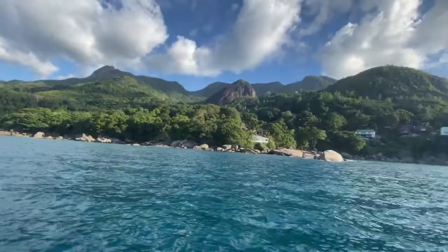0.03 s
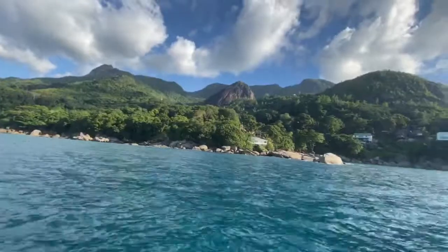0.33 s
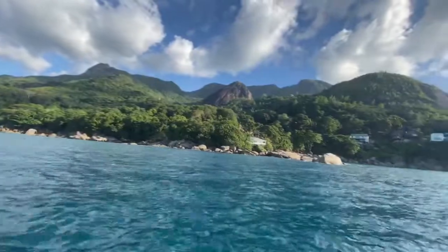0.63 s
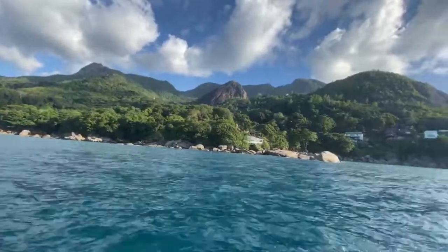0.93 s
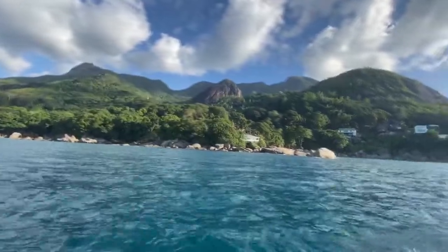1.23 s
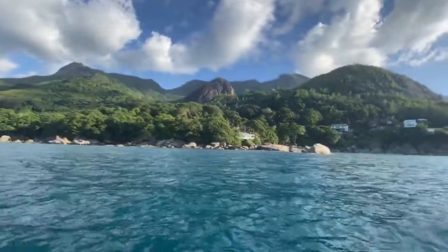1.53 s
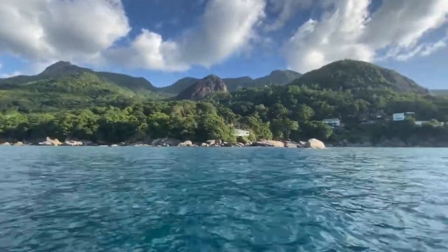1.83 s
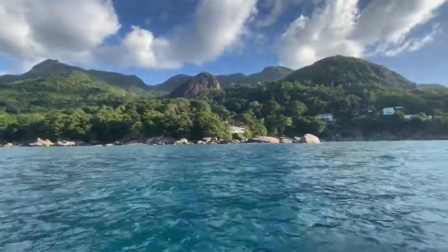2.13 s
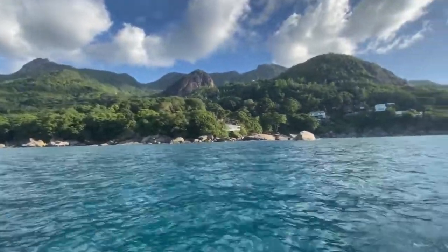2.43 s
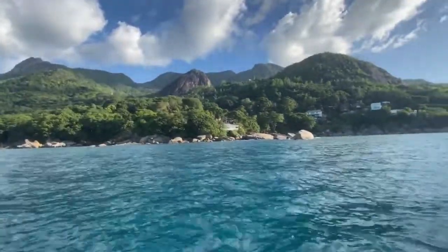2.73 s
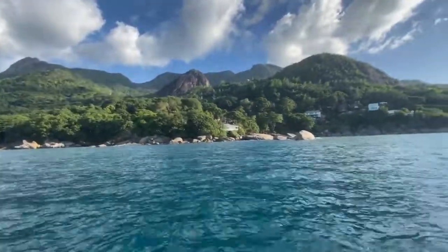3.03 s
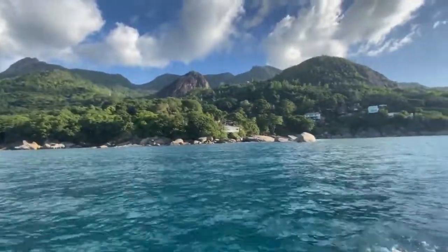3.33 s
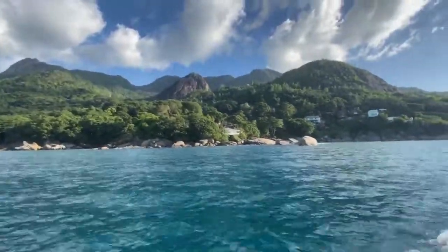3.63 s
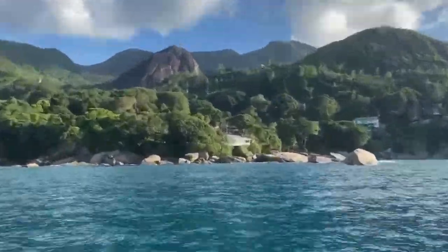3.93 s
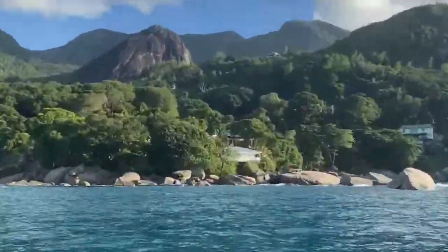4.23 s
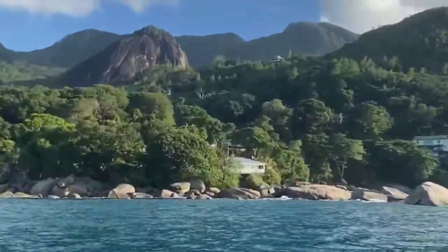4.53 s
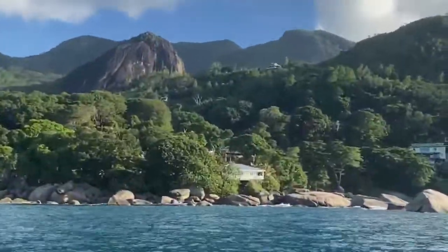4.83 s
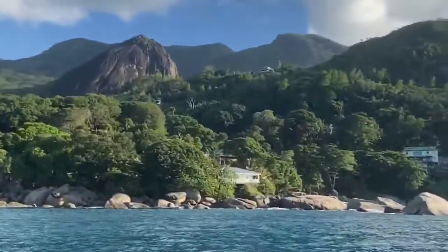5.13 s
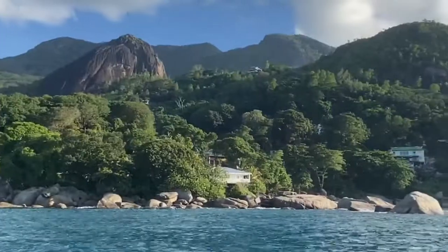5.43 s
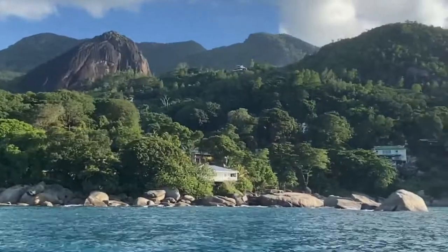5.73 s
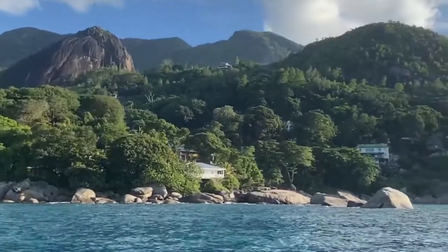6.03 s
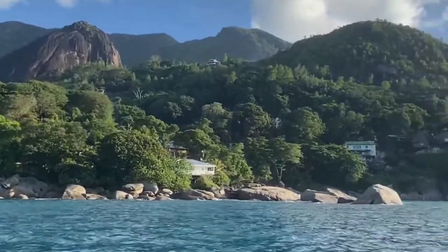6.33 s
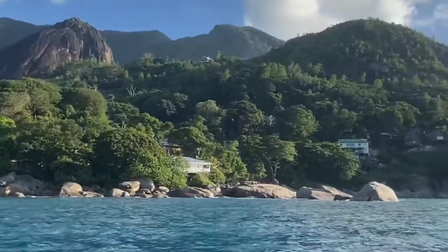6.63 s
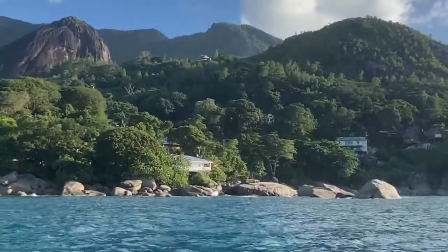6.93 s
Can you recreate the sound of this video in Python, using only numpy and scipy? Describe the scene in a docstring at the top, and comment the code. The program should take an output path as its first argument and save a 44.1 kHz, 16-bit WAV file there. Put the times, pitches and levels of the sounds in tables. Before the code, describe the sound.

Deep, ragged wind rumble and flutter on the microphone cover the foamy wash and faint engine of a boat at sea.

```python
"""On a motor boat running along a coast, a phone is held into the wind.
Eddies buffet its two microphone ports: deep rumble, ragged flutter, brief throbs and cracks.
Behind them, bow foam hisses and the engine drones on multiples of its shaft rate.
Near 4 s the camera zooms in and the stereo image narrows from very wide to almost mono."""
import sys
import numpy as np
from scipy import signal
from scipy.fft import rfft, irfft, next_fast_len
from scipy.io import wavfile
from scipy.ndimage import uniform_filter1d, minimum_filter1d

SR = 44100
rng = np.random.default_rng(int(sys.argv[2]) if len(sys.argv) > 2 else 0)


def write(x):
    x = np.atleast_2d(x).T
    wavfile.write(sys.argv[1], SR, np.round(np.clip(x, -1, 1) * 32767).astype(np.int16))


N = 316197
TIME_S = np.arange(N) / SR
FFT_SIZE = next_fast_len(N)

# camera zoom: t/s, zoom (0 wide, 1 fully in)
ZOOM_PATH = [(0, 0), (3.75, 0), (4.05, 0.5), (4.5, 0.64), (7.17, 0.83)]
# corner below which the ports move together: t/s, f/Hz
MONO_CORNER = [(0, 264), (1.2, 224), (1.6, 159), (2.2, 117), (2.8, 84.6), (3.1, 45), (7.17, 36.3)]
# spectra: f/Hz, wide gain/dB, zoomed gain/dB, wide side-to-mid/dB, zoomed side-to-mid/dB
FOAM_BANDS = [(810, -4, 24, -2, 3.5), (2200, 6.5, 11.5, 4, -29), (3500, 5.5, 6.5, -1.5, -49),
              (5640, 4.5, 1, -0.7, -46.5), (7160, -0.5, 2.5, -0.5, -38), (8360, -4.5, -15, 2, 18.5),
              (9440, -3, -0.5, -1.5, -5), (14300, -16, -11.5, 0, 2)]
RUMBLE_BANDS = [(22, -46, -32, -3, -8), (39.5, -17, -28, 1, -8), (61, 3, 4, 6.5, -16),
                (96, 2.5, 1, -4, -11), (159, -2.5, -3, -10, -8.5), (279, -11, -8, -6, -5.5),
                (494, -29, -49, 15, 26)]
FLUTTER_BANDS = [(136, 9, -12, 9, 6), (256, 5, 5.5, 6, -21), (480, 1.5, 8, 6, -14.5), (665, 2, 4.5, 6, -16),
                 (1136, 1.5, -8, 1, -9), (1383, -1, -10.5, 1, 0.5), (2130, -11, -36, -2, -7),
                 (3000, -21, -50, 2.5, 0), (4640, -31, -61, -1, -23), (7800, -48, -63, -11, -9)]
# engine drone: t/s, level/dB
ENGINE_LEVEL = [(0, -38), (.6, -26), (1.1, -29), (1.5, -25.5), (3, -42), (7.17, -33)]
# engine partials: multiple of shaft rate, relative level/dB
SHAFT_ORDERS = [(2, 4), (3, -25), (4, -24), (5, 1), (6, -1), (10, -1)]
# steady wake hiss, before trim: t/s, level/dB
WAKE_LEVEL = [(0, -42), (1.3, -47), (2.1, -49), (3.8, -54.5), (4.65, -56.5), (5.7, -51), (5.92, -46.5),
              (7.17, -45.5)]
# waves breaking on the bow, before trim: t/s, level/dB, foam decay/s
BOW_WAVES = [(.52, -39, 0.5), (.77, -35, 0.36), (1.47, -42, 0.2), (1.85, -46, 0.12), (2.42, -41, 0.57),
             (2.9, -47, 0.54), (3.501, -49.5, 1), (4.39, -47, 0.25), (4.89, -42.5, 0.29),
             (5.25, -43.5, 0.54)]
# spray landing: t/s, half-width/s, level/dB
SPRAY_SHEETS = [(0.484, 0.092, -33), (1.483, 0.059, -33.5)]
# steady wind, before trims: t/s, deep rumble/dB, upper rumble/dB, flutter/dB, treble edge/dB
WIND_LEVELS = [(0, -22.5, -21, -28, -35), (.85, -20, -14.5, -23.5, -33.5), (1.3, -16.5, -18, -24, -31.5),
               (1.75, -22, -18.5, -24.5, -31), (2.15, -19.5, -23.5, -26, -30.5),
               (2.6, -20.5, -27, -26, -32), (2.9, -21, -28.5, -28, -35.5), (3.17, -28.5, -47, -24.5, -33),
               (3.4, -24.5, -34, -23.5, -35), (3.62, -29, -25, -24.3, -34), (3.95, -39, -23, -27, -46),
               (4.6, -18.5, -21, -24.5, -34), (4.7, -37, -25, -34.5, -49), (5.0, -34, -30.5, -36, -59.5),
               (5.6, -27.5, -32.5, -34.5, -46), (5.85, -26.5, -30, -26.5, -40.5),
               (6.35, -27.5, -24, -30.5, -44), (7.17, -21.5, -22.5, -25, -45)]
# gusts: t/s, half-width/s, flutter lift/dB, deep rumble lift/dB
WIND_GUSTS = [(0.185, 0.049, 0, 8.5), (1.504, 0.053, 2, 7), (2.32, 0.092, 1, 0), (4.256, 0.089, 5, -1),
              (4.345, 0.037, 0, 8), (5.26, 0.23, 7.5, 4.5), (6.117, 0.048, 2, -9)]
# stream slipping off the phone: t/s
LULL_TIMES = [1.299, 2.869, 3.227, 3.462, 4.115, 4.635, 4.74, 5.215, 5.555, 5.80, 5.895, 6.28, 6.605, 6.70,
              6.91, 7.10]
# even eddy shedding: t/s, f/Hz, peak/dB, length/s
RUMBLE_THROBS = [(0.308, 101.5, -9.5, 0.09), (0.458, 99.6, -12, 0.1), (0.83, 102.5, -9, 0.055),
                 (1.016, 133, -12, 0.052), (1.183, 116, -11, 0.066), (1.498, 71.3, -14.5, 0.15),
                 (1.74, 61.8, -10, 0.11), (1.914, 106, -10.5, 0.028), (1.954, 160, -15.5, 0.038),
                 (2.355, 86, -20, 0.14), (3.057, 116.7, -20, 0.032), (3.274, 100, -15.5, 0.036),
                 (3.394, 116.1, -16.5, 0.054), (4.002, 125, -10.5, 0.017), (4.593, 147, -28, 0.051),
                 (5.242, 105, -17, 0.026), (6.776, 115, -11.5, 0.051), (6.858, 173, -9, 0.02),
                 (7.06, 102.5, -11.5, 0.024)]
# single vortices at a port rim: t/s, level/dB
RIM_CRACKS = [(.878, -21), (1.012, -22), (1.115, -22), (1.242, -25), (1.328, -20), (1.502, -26),
              (1.53, -19), (1.58, -14), (1.621, -25.5), (1.671, -19.5), (1.697, -18), (1.797, -21.5),
              (1.864, -21), (1.895, -19), (1.922, -19.5), (2.005, -23), (2.04, -23), (2.129, -25),
              (2.28, -22), (2.292, -13), (2.44, -21.5), (2.703, -24), (2.815, -23), (2.908, -25.5),
              (3.252, -28.5), (3.375, -27), (3.448, -25.5), (3.8, -30), (3.817, -28.5), (4.012, -30.5),
              (4.206, -32), (4.589, -37)]
# hardest eddies, before band gains: t/s, level/dB, length/s
EDDY_SLAPS = [(0.177, -24, .0051), (0.523, -23, 0.0096), (0.743, -23.5, .012), (0.794, -22, .012),
              (0.874, -17, 0.014), (0.9, -19, .011), (1.017, -21, 0.02), (1.041, -21, 0.03),
              (1.327, -22, 0.012), (1.394, -19, 0.02), (1.582, -13, 0.011), (1.712, -27, .013),
              (1.974, -23, 0.0095), (2.288, -17, 0.013), (2.601, -19, .01), (2.651, -25, 0.017),
              (2.982, -39, 0.017), (3.157, -27, .013), (3.195, -20.5, 0.03), (3.295, -14, 0.014),
              (3.402, -23, 0.01), (3.526, -20.5, 0.0045), (3.596, -23, 0.011), (3.614, -18, 0.015),
              (3.768, -26, .014), (3.81, -33, 0.0069), (4.168, -22.5, 0.039), (4.586, -21.5, 0.043),
              (5.12, -26.5, .016), (5.197, -19.5, .011), (5.861, -23, .021), (6.406, -23.5, 0.013),
              (6.445, -26, .0098), (6.5, -30, 0.01), (6.568, -24.5, .015), (6.649, -23.5, 0.052),
              (6.772, -18.5, 0.039), (6.856, -19.5, 0.013), (6.985, -21, 0.02), (7.05, -18.5, 0.022),
              (7.071, -10, 0.0063)]
# fitfulness of the stream: t/s, added flutter depth/dB
FLUTTER_DEPTH = [(0, -1.5), (2.6, -0.5), (3.6, 0), (4.3, 2), (5.5, -0.5), (7.17, 2)]
# flutter bias to the windward port: f/Hz, left lean (0-1)
WINDWARD_LEAN = [(200, 0.21), (550, 0.35), (1050, 0.29), (1700, 0.4), (4000, 1)]


def undb(db):
    """Decibels to gain."""
    return np.exp(np.asarray(db, np.float32) * np.float32(np.log(10) / 20))


def curves(table):
    """Each column of a timed table, interpolated per sample."""
    t_s, *columns = np.transpose(table)
    return [np.interp(TIME_S, t_s, column).astype(np.float32) for column in columns]


def swell(age_s, rise_s, fall_s):
    """Gaussian hump, height 1 at age 0."""
    return np.exp(-np.minimum((age_s / np.where(age_s < 0, rise_s, fall_s)) ** 2, 50))


def walk(rate_hz):
    """Smooth random drift, unit spread."""
    points = rng.standard_normal(4096)
    drift = np.interp(TIME_S * rate_hz, np.arange(len(points)), points)
    drift = uniform_filter1d(drift, int(SR / rate_hz / 2))
    return (drift / drift.std()).astype(np.float32)


def pops(rate_hz, spread_db):
    """Sparse impulses at each port, mostly small, a few large."""
    out = np.zeros((2, N))
    where, sign, size = rng.random((8000, 3))[:int(rate_hz * 2 * N / SR)].T
    level_db = spread_db * np.minimum(-np.log(1 - size), 3.5)
    out.flat[(where * 2 * N).astype(int)] = np.sign(sign - .5) * undb(level_db)
    return out


def bandpass(x, order, band_hz):
    """Butterworth band-pass."""
    return signal.sosfilt(signal.butter(order, band_hz, "band", fs=SR, output="sos"), x)


def normalise(pair, band_hz):
    """Scale a stereo pair to unit mid rms within a band."""
    return pair / bandpass(pair.mean(axis=0), 4, band_hz).std()


def ports(drive, bands, lean, lead, gain):
    """Two independent drives to left and right, by band; lean favours the left, lead advances it."""
    zoom, = curves(ZOOM_PATH)
    mono_hz, = curves(MONO_CORNER)
    spectrum = rfft(drive.astype(np.float32), FFT_SIZE)
    log_f = np.log(np.arange(spectrum.shape[1]) * SR / FFT_SIZE + 1)
    centres = np.log([row[0] for row in bands])
    edges = np.r_[centres[0] - np.log(2), centres, centres[-1] + np.log(2)]
    mid, side = 0, 0
    for k, (hz, wide_db, zoomed_db, wide_side_db, zoomed_side_db) in enumerate(bands):
        band = spectrum * np.interp(log_f, edges[k:k + 3], [0, 1, 0]).astype(np.float32)
        envelope = gain(hz) * undb(wide_db + zoom * (zoomed_db - wide_db))
        a, b = irfft(band, FFT_SIZE)[:, :N] * envelope
        left, ahead = float(lean(hz)), float(lead(hz))
        quadrature = (irfft(1j * band, FFT_SIZE)[:, :N] * envelope).sum(axis=0) if ahead else 0
        unshared = max(1 - left ** 2 - ahead ** 2, 0) ** .5
        width = undb(wide_side_db + zoom * (zoomed_side_db - wide_side_db))
        width = width / np.sqrt(1 + (mono_hz / hz) ** 8)
        mid = mid + a + b
        side = side + width * (left * (a + b) + ahead * quadrature + unshared * (a - b))
    return np.array([mid + side, mid - side])


def engine(shaft_hz=23.38, wander=0.0283, rough_db=7.0):
    """Drone through the hull: speed wanders with load, firings are uneven."""
    phase = 2 * np.pi * np.cumsum(shaft_hz * (1 + wander * walk(4.7).astype(float))) / SR
    drone = sum(undb(db + rough_db * walk(8.4)) * np.sin(order * phase + 2 * np.pi * rng.random())
                for order, db in SHAFT_ORDERS)
    return drone / drone.std() * undb(curves(ENGINE_LEVEL)[0])


def wash_level_db(rise_s=0.13):
    """Each wave throws up foam that dies away over the wake hiss."""
    power = undb(curves(WAKE_LEVEL)[0]) ** 2
    for t_s, db, decay_s in BOW_WAVES:
        age_s = TIME_S - t_s
        foam = np.exp(-np.where(age_s < 0, (age_s / rise_s) ** 2, age_s / decay_s))
        power = power + (undb(db) * foam) ** 2
    return 10 * np.log10(power).astype(np.float32)


def wash(patchy_db=1.1, left_hz=4800, calm_db=-46, pivot_hz=7000, trim_db=-0.74):
    """Foam and bursting droplets hiss along the hull; the spray lies to the left."""
    level_db = wash_level_db()
    foam = rng.standard_normal((2, N)) + 1.8 * pops(rate_hz=400, spread_db=4.2)
    churn_db = walk(55)

    def gain(hz):
        # harder wash, finer spray
        tilt_db = 0.19 * (level_db - calm_db) * np.clip(np.log2(hz / pivot_hz), -1, 1)
        return undb(churn_db + tilt_db + patchy_db * walk(40))

    pair = ports(foam, FOAM_BANDS, gain=gain, lead=lambda hz: 0,
                 lean=lambda hz: 0.93 * np.exp(-(np.log2(hz / left_hz) / 0.32) ** 2))
    return normalise(pair, (4060, 12400)) * undb(level_db + trim_db)


def splashes(band_hz=(4000, 6600), right_db=-9):
    """Thin sheets of spray land on the water to the left."""
    fizz = bandpass(rng.standard_normal((2, N)), 2, band_hz)
    envelope = sum(undb(db) * swell(TIME_S - t_s, half_s, half_s) for t_s, half_s, db in SPRAY_SHEETS)
    return fizz / fizz.std() * envelope * undb([[0], [right_db]])


def wind_levels_db(lull_db=-5.5, lull_s=0.014, upper_per_db=0.13, edge_per_db=2.22):
    """Steady wind plus gusts and lulls: deep rumble, upper rumble, flutter, treble edge."""
    deep_db, upper_db, flutter_db, edge_db = curves(WIND_LEVELS)
    lift_db = lull_db * sum(swell(TIME_S - t_s, lull_s, lull_s) for t_s in LULL_TIMES)
    for t_s, half_s, flutter_lift_db, deep_lift_db in WIND_GUSTS:
        gust = swell(TIME_S - t_s, half_s, half_s)
        lift_db += flutter_lift_db * gust
        deep_db += deep_lift_db * gust
    return (deep_db, upper_db + upper_per_db * lift_db,
            flutter_db + lift_db, edge_db + edge_per_db * lift_db)


def turbulence(slow_hz=70, fast_hz=230, limit=1.3, mean_s=0.049):
    """Air speed swings per port: big eddies cover both, small ones differ."""
    shared = walk(slow_hz) + 1.63 * walk(fast_hz)
    speed = np.array([shared + 0.99 * (walk(2 * slow_hz) + walk(2 * fast_hz)) for _ in range(2)])
    speed = speed - uniform_filter1d(speed, int(mean_s * SR))  # lulls offset surges
    return limit * np.tanh(speed / speed.std() / limit)


def buffet(speed, depth_db):
    """Pressure envelope following air speed, mean power near 1."""
    return undb(depth_db * speed) / np.exp(np.log(undb(depth_db)) ** 2 * speed.var())


def cracks(band_hz=(950, 3300), rise_s=0.0009, fall_s=0.0026, right_db=-5):
    """Vortices burst at the rims, loudest in the windward left port."""
    out = np.zeros((2, N))
    for t_s, db in RIM_CRACKS:
        near = slice(int(t_s * SR) - 512, int(t_s * SR) + 512)
        hump = swell(TIME_S[near] - t_s, rise_s, fall_s)
        burst = bandpass(hump * rng.standard_normal((2, len(hump))), 3, band_hz)
        burst *= undb([[0], [right_db]])
        out[:, near] += undb(db) * burst * np.sqrt(np.mean(hump) / np.mean(burst ** 2))
    return out


def crackles(highpass_hz=2300):
    """The smallest vortices snap off the rims as dry ticks."""
    highpass = signal.butter(1, highpass_hz, "high", fs=SR, output="sos")
    return 5.65 * signal.sosfilt(highpass, pops(rate_hz=100, spread_db=4.5))


def slaps():
    """Envelope of hard eddies: each strikes faster than it tears away."""
    out = np.zeros(N, np.float32)
    for t_s, db, length_s in EDDY_SLAPS:
        near = slice(int((t_s - .05) * SR), int((t_s + .05) * SR))
        out[near] += undb(db) * swell(TIME_S[near] - t_s, 0.42 * length_s, 0.55 * length_s)
    return out


def flutter(speed, level_db, edge_db, edge_hz=2000, lead_hz=950, body_hz=900, draw_s=0.067,
            trim_db=-3.5, edge_trim_db=9.0, zoomed_edge_db=9.0):
    """Small eddies tear at the port rims; faster air reaches higher, so treble is most ragged."""
    zoom, = curves(ZOOM_PATH)
    fitful_db, = curves(FLUTTER_DEPTH)
    slap = slaps()
    # a slap draws in air: the stream slackens before and after
    draw = 0.96 * uniform_filter1d(slap, int(draw_s * SR)) / undb(level_db)
    slack = 1 / np.sqrt(1 + draw ** 2)
    rim_db = edge_db + edge_trim_db + zoomed_edge_db * zoom

    def gain(hz):
        edge_share = float(np.clip(1 + np.log2(hz / edge_hz), 0, 1))
        depth_db = float(3.0 + 1.23 * np.log2(hz / 700)) + fitful_db
        swing = buffet(speed, depth_db)
        stream = slack * swing * undb(trim_db + level_db)
        hard = slap * np.sqrt(swing)
        return np.sqrt(stream ** 2 + hard ** 2) * undb(edge_share * (rim_db - level_db))

    ticks = crackles() * undb(0.7 * (edge_db - edge_db.mean()))  # stronger in hard wind
    pair = ports(rng.standard_normal((2, N)) + ticks, FLUTTER_BANDS, gain=gain,
                 lean=lambda hz: np.interp(hz, *np.transpose(WINDWARD_LEAN)),
                 lead=lambda hz: 0.36 / (1 + (hz / lead_hz) ** 4))
    return pair * np.sqrt(SR / 4 / body_hz)  # two drives, power gathered in the body's bandwidth


def throbs(waver=0.1002, duck=0.23):
    """Evenly shed eddies throb on one pitch; returns the throbs and a ducking gain for the rumble."""
    out, rumble_gain = np.zeros(N), np.ones(N)
    clock_s = np.cumsum(1 + waver * walk(45).astype(float)) / SR
    for t_s, hz, db, length_s in RUMBLE_THROBS:
        hump = swell(TIME_S - t_s, length_s / 2, length_s / 2)
        out += undb(db) * hump * np.sin(2 * np.pi * (hz * clock_s + rng.random()))
        rumble_gain *= 1 - duck * hump
    return out, rumble_gain


def rumble(speed, deep_db, upper_db, split_hz=80, deep_trim_db=-2.0):
    """Large eddies press on the whole phone; the largest thud deepest."""
    swing = buffet(speed, depth_db=2.0) * buffet(walk(18), depth_db=1.5)
    pair = ports(rng.standard_normal((2, N)), RUMBLE_BANDS,
                 lean=lambda hz: .15, lead=lambda hz: .2, gain=lambda hz: swing)
    low = signal.sosfiltfilt(signal.butter(4, split_hz, fs=SR, output="sos"), pair)
    deep = normalise(low, (35, split_hz))
    upper = normalise(pair - low, (split_hz, 220))
    return deep * undb(deep_db + deep_trim_db) + upper * undb(upper_db)


def scene():
    """One turbulent stream drives rumble and flutter, over water and engine."""
    deep_db, upper_db, flutter_db, edge_db = wind_levels_db()
    speed = turbulence()
    throb, rumble_gain = throbs()
    bass = rumble_gain * rumble(speed, deep_db, upper_db) + throb
    wind = bass + flutter(speed, flutter_db, edge_db) + cracks()
    return wind + wash() + splashes() + engine()


def record(dry, hold_s=0.0061, top_hz=15200):
    """The phone's limiter ducks peaks over full scale; a steep low-pass cuts the top."""
    span = int(hold_s * SR)
    needed_gain = np.minimum(1, 1 / (np.abs(dry).max(axis=0) + 1e-9))
    limited = dry * uniform_filter1d(minimum_filter1d(needed_gain, 2 * span), span)
    return signal.sosfilt(signal.ellip(10, .2, 80, top_hz, fs=SR, output="sos"), limited)


dry = scene()
out = record(dry)
write(out)
```